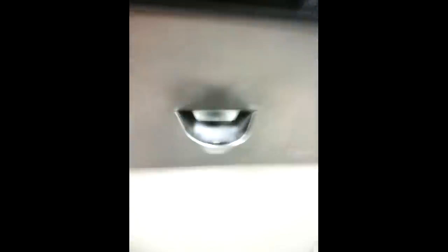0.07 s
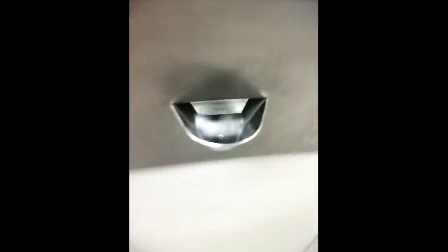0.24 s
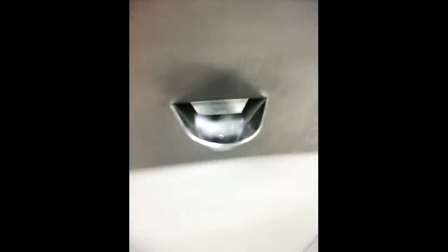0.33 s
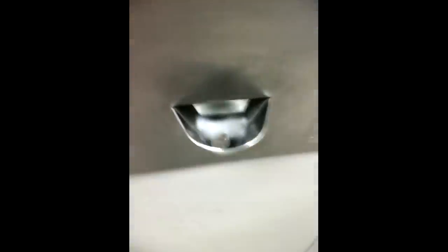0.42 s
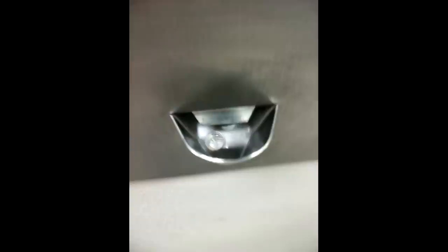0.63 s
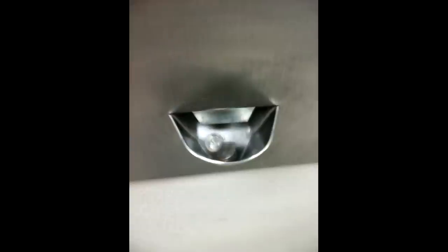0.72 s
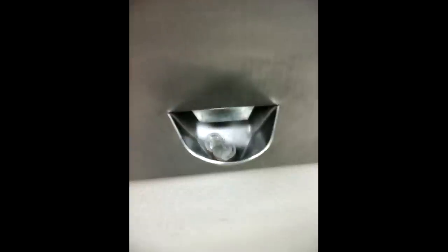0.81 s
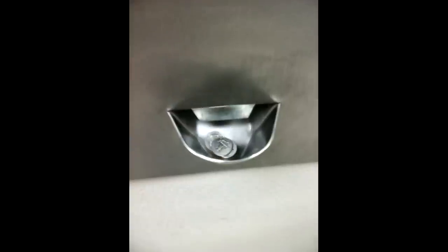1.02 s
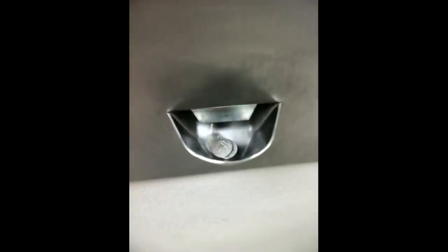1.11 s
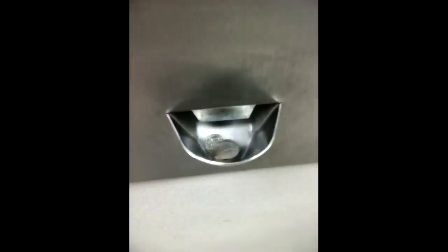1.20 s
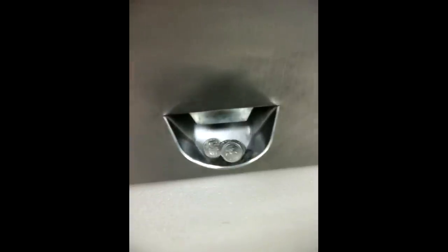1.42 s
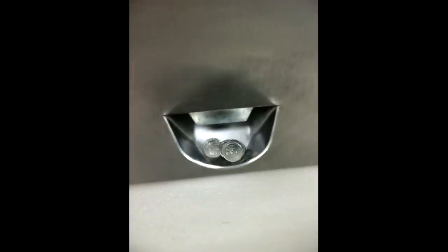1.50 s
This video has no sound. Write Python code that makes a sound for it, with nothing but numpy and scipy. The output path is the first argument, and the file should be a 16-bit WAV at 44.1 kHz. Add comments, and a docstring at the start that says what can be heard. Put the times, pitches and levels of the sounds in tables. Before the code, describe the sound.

Coins drop clinking into a steel tray as a machine clacks and faintly whirrs.

```python
"""A motor whirrs inside a change machine, then coins are paid into its steel tray.
The ejector clacks and rebounds, the cabinet panels thud, and a moment later a coin strikes
the chute, bounces, slides down and clinks against the others. Each blow is a crack of dense
modes over a few that ring on, with a short cabinet echo. At the end the motor winds down,
a coin skids round the bowl and there is one last clack."""
import sys
import numpy as np
from scipy import signal
from scipy.fft import rfft, irfft
from scipy.io import wavfile

SR = 44100
rng = np.random.default_rng(int(sys.argv[2]) if len(sys.argv) > 2 else 0)


def bounce(signal):
    """Save signal as a 16-bit WAV file at the path given by the first command-line argument."""
    frames = np.transpose(np.atleast_2d(signal))
    limited = np.clip(frames, -1, 1)
    pcm = np.round(limited * 32767).astype(np.int16)
    wavfile.write(sys.argv[1], SR, pcm)


N = 68355
T = np.arange(N) / SR

# Coins land and bounce: start_s, level_db, tilt_db_per_octave, spot ("middle" or "side")
COIN_HITS = [(.2546, -14, -1, "middle"), (.2610, -20.5, -4, "side"), (.2785, -38, 2, "side"),
             (.3105, -37.5, 5.5, "middle"), (.4393, -14.5, -0.5, "middle"), (.4605, -25, -4.5, "middle"),
             (0.5606, -35.5, 3, "middle"), (0.6290, -28, 2.5, "side"), (0.6354, -19, -1.5, "middle"),
             (0.7221, -34.5, -6, "middle"), (1.0225, -13.5, 0.5, "side"), (1.069, -32, 8, "side")]
# The ring of the steel chute: pitch_hz, level_db, t60_s
CHUTE_MODES = [(1010, -22.5, .17), (2915, -10, .09), (3010, -9, .1), (3258, -7, .065), (3597, -2, .052),
               (4150, -17, .05), (4890, 6, .04), (6110, -19, .06), (6620, -18, .07), (7890, -9.5, .05),
               (8400, -11, .055)]
# The crack of its dense modes: frequency_hz, level_db
CHUTE_CRACK_EQ = [(60, -47), (250, -19), (700, -18), (1100, -6.5), (2400, -3.5), (3000, 9.5), (5000, 8.5),
                  (5600, -2), (8600, 5), (10500, -15.5), (16000, -21)]


def coin_hits(ring_db=-3, off_centre_db=-11.5, slap_lag_s=.0018, slap_t60_s=.016):
    """Coins hit the chute edge first, then slap flat; off centre they stir its main mode less."""
    out = np.zeros(N)
    crack_eq = with_peaks(CHUTE_CRACK_EQ, CHUTE_MODES)
    slap = 1 + (T > slap_lag_s) * decay(abs(T - slap_lag_s), slap_t60_s)
    main_hz = max(CHUTE_MODES, key=lambda mode: mode[1])[0]
    for start_s, level_db, tilt, spot in COIN_HITS:
        modes = [(hz, db + ring_db + off_centre_db * (spot == "side" and hz == main_hz), t60_s)
                 for hz, db, t60_s in CHUTE_MODES]
        hit = strike(modes, crack_eq, tilt, crack_db=-3, crack_t60_s=.051, spread_db=.2)
        add(out, start_s, from_db(level_db) * hit * slap[:len(hit)])
    return out


# The ejector fires: start_s, snap_db, rebound_delay_s, rebound_db, tilt_db_per_octave
CLACKS = [(.2130, -13.5, 0.0075, -29, 2), (0.3924, -20, 0.0068, -24, -1), (0.486, -19, .0075, -29.5, 0),
          (0.5877, -15.5, 0.006, -29.5, 1.5), (0.6837, -17, 0.0079, -23.5, 0),
          (0.9728, -13.5, .0072, -22.5, 0), (1.1636, -41, 0.005, -31.5, 5), (1.5250, -22, 0.0086, -34, 4.5)]
# The ring of the ejector: pitch_hz, level_db, t60_s
EJECTOR_MODES = [(1749, -17.5, 0.069), (2791, -12, 0.069), (3650, -10, .03), (4800, -10.5, 0.012),
                 (5330, -9.5, 0.04), (5800, -19, 0.05), (8900, -29.5, 0.12)]
# The crack of its dense modes: frequency_hz, level_db
EJECTOR_CRACK_EQ = [(60, -43), (250, -8), (700, -9), (1700, 3), (3500, 3), (5300, 11.5), (6900, 0.5),
                    (7600, 0), (9200, -1.5), (10500, -20), (16000, -22)]
# The ping of rebound and latch: pitch_hz, level_db, t60_s
PING_MODES = [(5350, -6.5, 0.11), (6490, 8, 0.047), (6880, 5.5, 0.036), (9360, -17, 0.09)]
# The latch falls back: start_s, level_db
LATCH_TICKS = [(0.2362, -29.5), (0.4165, -35), (0.613, -28), (0.9975, -34), (1.5440, -30.5)]


def ejector(detune=.008, ping_db=-5.5):
    """Each clack is a snap and a pinging rebound, never tuned quite alike; a latch ticks after some."""
    out = np.zeros(N)
    steel = EJECTOR_MODES, EJECTOR_CRACK_EQ
    for start_s, snap_db, delay_s, rebound_db, tilt in CLACKS:
        snap = strike(*steel, tilt, crack_db=-8.5, crack_t60_s=.038, detune=detune)
        rebound = strike(*steel, tilt, crack_db=-2, crack_t60_s=.047, detune=detune)
        ping = from_db(ping_db) * ring(PING_MODES, len(rebound), detune=detune)
        add(out, start_s, from_db(snap_db) * snap)
        add(out, start_s + delay_s, from_db(rebound_db) * (rebound + ping))
    for start_s, level_db in LATCH_TICKS:
        latch = strike(PING_MODES[:1], EJECTOR_CRACK_EQ, tilt=0, crack_db=-6, crack_t60_s=.027)
        add(out, start_s, from_db(level_db) * latch)
    return out


# Edge meets edge: start_s, level_db
EDGE_TICKS = [(.4465, -21), (0.4924, -21), (.504, -23.5), (.572, -26), (0.731, -29), (.7735, -24.5),
              (0.802, -44), (.844, -30)]


def edge_ticks(t60_s=.0079):
    """Coin edges nick each other: very short, bright bursts of noise."""
    out, t = np.zeros(N), T[:1024]
    bright_eq = [(2000, -17), (7500, 8.5), (11000, -14)]   # frequency_hz, level_db
    for start_s, level_db in EDGE_TICKS:
        burst = equalise(rng.standard_normal(len(t)), bright_eq)
        add(out, start_s, from_db(level_db) * burst * decay(t, t60_s))
    return out


# A touch sets a coin ringing: start_s, coin_size, level_db
CLINKS = [(.262, "large", -57), (0.497, "large", -41), (0.566, "large", -45), (0.729, "large", -45),
          (0.769, "large", -41.5), (.799, "large", -50), (1.04, "large", -57), (1.150, "large", -39),
          (1.375, "large", -48.5), (0.687, "small", -37.5), (0.638, "medium", -38), (.773, "medium", -43.5),
          (1.132, "medium", -46.5)]
# The free ring of each coin size: pitch_hz, level_db, t60_s
COIN_MODES = {"large": [(6640, -1, .35), (15289, -2.5, .3)], "small": [(7585, 0, .6)],
              "medium": [(9300, -3, .3), (9420, -5, .3), (14067, -13, .06)]}


def clinks(rocking_hz=45, shimmer_depth=.45, attack_s=.0011):
    """Coins ring on after a touch, shimmering as they rock."""
    out = np.zeros(N)
    attack = np.minimum(T / attack_s, 1)
    for start_s, size, level_db in CLINKS:
        shimmer = 1 + shimmer_depth * wander(rocking_hz)
        add(out, start_s, from_db(level_db) * ring(COIN_MODES[size], N) * shimmer * attack)
    return out


# The swell of coins sliding down the chute: time_s, level_db
SLIDE_FADER = [(.21, -75), (.26, -58), (.32, -36), (.38, -41), (.54, -39), (.66, -37), (.84, -40.5),
               (.94, -51.5), (1.02, -42.5), (1.08, -38.5), (1.16, -45), (1.26, -52.5), (1.34, -77),
               (1.55, -56.5)]
# The tone of their rattle: frequency_hz, level_db
SLIDE_EQ = [(700, -39), (1100, -18), (2500, 2), (3500, 6), (4800, 7), (5500, 2), (7200, -2.5), (9300, -2),
            (10500, -17.5), (16000, -13)]


def slide(chute_db=-28, coins_db=-22.5):
    """Dense small touches of sliding coins rattle and set the chute and the coins ringing."""
    t = T[:N // 8]
    touches = contacts(per_s=900, spread_db=2.5)
    rattle = signal.fftconvolve(touches, rng.standard_normal(len(t)) * decay(t, .023))[:N]
    chute = signal.fftconvolve(touches, ring(CHUTE_MODES, len(t)))[:N]
    coins = signal.fftconvolve(touches, ring(COIN_MODES["large"], len(t)) * decay(t, .012))[:N]
    ringing = from_db(chute_db) * unit_rms(chute) + from_db(coins_db) * unit_rms(coins)
    return fader(SLIDE_FADER) * (equalise(rattle, SLIDE_EQ) + ringing)


# Swells of rubbing on steel, some coins skidding, some the tray ringing on after coins land: peak_s, rise_s,
# fall_s, level_db, centre_hz, width_octaves
SKIDS = [(0.097, 0.021, 0.014, -42, 4400, 0.17), (0.149, 0.011, 0.029, -45.5, 4330, 0.26),
         (0.837, 0.011, 0.017, -42, 1110, 0.22), (.843, 0.0079, 0.023, -43, 8100, 0.54),
         (1.07, 0.033, 0.11, -40.5, 2970, 0.014), (1.13, 0.067, 0.12, -45.5, 3640, 0.082),
         (1.3, .03, 0.025, -47, 1390, 0.058), (1.321, 0.0071, 0.022, -43, 8400, 0.31),
         (1.384, 0.013, 0.022, -41.5, 2530, 0.8), (1.385, 0.016, 0.045, -49, 8700, 0.26),
         (1.381, 0.012, 0.038, -44, 1097, 0.073), (1.43, 0.06, 0.024, -47.5, 1415, 0.12)]


def skids():
    """Short swells of fine rubbing, each ringing the steel roughly round one resonance."""
    out, grid_hz = np.zeros(N), np.geomspace(100, 18000, 2000)
    for peak_s, rise_s, fall_s, level_db, centre_hz, width_octaves in SKIDS:
        bell_db = -20 * np.log10(1 + (np.log2(grid_hz / centre_hz) / width_octaves) ** 2)
        swell = np.exp(-.5 * ((T - peak_s) / np.where(T < peak_s, rise_s, fall_s)) ** 2)
        rubbing = contacts(per_s=3300, spread_db=.5)
        out += from_db(level_db) * swell * equalise(rubbing, np.column_stack([grid_hz, bell_db]))
    return out


# Knocks in the cabinet panels: start_s, level_db, pitch_hz, t60_s
PANEL_THUDS = [(0.214, -35, 234, 0.094), (0.393, -30, 239, 0.083), (0.586, -41, 301, 0.13),
               (0.682, -43, 302, 0.18), (0.715, -43.5, 213.3, 0.29), (.974, -47.5, 224, 0.32)]


def panel_thuds(attack_s=.0084):
    """A knocked panel sounds one low, soft-edged, dying tone."""
    out, t = np.zeros(N), T[:N // 3]
    attack = np.minimum(t / attack_s, 1)
    for start_s, level_db, pitch_hz, t60_s in PANEL_THUDS:
        tone = np.sin(2 * np.pi * pitch_hz * t)
        add(out, start_s, from_db(level_db) * tone * decay(t, t60_s) * attack)
    return out


# The gear whirr runs, then drops away: time_s, level_db
WHIRR_FADER = [(0, -45), (.11, -42), (.2, -44), (.45, -42), (.8, -44.5), (.95, -45.5), (1.15, -42.5),
               (1.29, -46.5), (1.33, -53), (1.36, -68), (1.44, -63.5), (1.5, -64.5), (1.55, -64.5)]
# Its midrange tone: frequency_hz, level_db
WHIRR_EQ = [(400, -55), (700, -10.5), (900, -1), (1050, 7), (1400, 3), (2100, 2), (3000, -4.5),
            (5500, -7.5), (9000, -21.5), (15000, -46)]
# The cabinet rumble comes and goes: time_s, level_db
RUMBLE_FADER = [(0, -54), (.13, -55), (.23, -49.5), (.33, -53.5), (.41, -51), (.62, -52), (.77, -72.5),
                (.84, -58), (1, -49.5), (1.14, -68), (1.2, -50.5), (1.28, -72), (1.55, -67.5)]
# Its low body: frequency_hz, level_db
RUMBLE_EQ = [(25, -8), (70, -32), (170, -14.5), (225, -3.5), (310, 4), (380, -2), (460, 5), (620, -15.5),
             (1500, -51)]
# Motor hum and mains hum: pitch_hz, level_db
HUM_TONES = [(103, -63.5), (120, -61)]
# Both hums fade: time_s, gain_db
HUM_FADER = [(0, 1), (.7, 0.5), (1.1, -1), (1.55, -12)]


def motor(flutter_db=1.55, waver_db=4.8):
    """Fluttering gear whirr, cabinet rumble and two beating hums that waver."""
    flutter = from_db(flutter_db * wander(45))
    whirr = fader(WHIRR_FADER) * flutter * equalise(rng.standard_normal(N), WHIRR_EQ)
    rumble = fader(RUMBLE_FADER) * equalise(rng.standard_normal(N), RUMBLE_EQ)
    hum = np.zeros(N)
    for pitch_hz, level_db in HUM_TONES:
        gain = from_db(level_db + waver_db * wander(13.6))
        hum += gain * np.sin(2 * np.pi * (pitch_hz * T + rng.random()))
    return whirr + rumble + fader(HUM_FADER) * hum


def cabinet_echo(x, t60_s=.53, wet_db=-11.5, predelay_s=.00046):
    """The cabinet and the room add a short diffuse tail."""
    t = T[:N // 3]
    tail = rng.standard_normal(len(t)) * decay(t, t60_s) * (t > predelay_s)
    tail /= np.linalg.norm(tail)
    return x + from_db(wet_db) * signal.fftconvolve(x, tail)[:N]


def strike(modes, crack_eq, tilt, crack_db, crack_t60_s, attack_s=.00035, **scatter):
    """A blow on steel: a crack of dense modes over the few that ring on."""
    t = T[:8192]
    crack = equalise(rng.standard_normal(len(t)), crack_eq, tilt) * decay(t, crack_t60_s)
    ringing = ring(modes, len(t), tilt, **scatter)
    return (ringing + from_db(crack_db) * crack) * np.minimum(t / attack_s, 1)


def ring(modes, length, tilt=0, spread_db=4.5, detune=0):
    """Decaying sines, scattered at every blow in level and, by the fraction detune, in pitch."""
    out, t = np.zeros(length), T[:length]
    pivot_hz = np.median([mode[0] for mode in modes])
    for hz, db, t60_s in modes:
        gain = from_db(db + tilt * np.log2(hz / pivot_hz) + spread_db * rng.normal())
        pitch_hz = hz * (1 + detune * rng.normal())
        out += gain * decay(t, t60_s) * np.sin(2 * np.pi * (pitch_hz * t + rng.random()))
    return out


def contacts(per_s, spread_db):
    """Small touches: random impulses of uneven size."""
    impulses = (rng.random(N) < per_s / SR) * rng.choice([-1, 1], N)
    return impulses * from_db(spread_db * np.minimum(rng.exponential(1, N), 4))


def with_peaks(eq, modes, half_width_hz=70, boost_db=4):
    """An EQ curve with a resonant peak added at each mode."""
    grid_hz = np.geomspace(30, 18000, 2000)
    hz, db = np.transpose(eq)
    base_db = np.interp(np.log(grid_hz), np.log(hz), db)
    peaks = np.max([1 / (1 + ((grid_hz - mode[0]) / half_width_hz) ** 2) for mode in modes], axis=0)
    return np.column_stack([grid_hz, base_db + boost_db * peaks])


def equalise(x, eq, tilt=0):
    """Shape x with an EQ curve, tilted in dB per octave, and scale it to rms 1."""
    hz, db = np.transpose(eq)
    octave = np.log2(np.arange(len(x) // 2 + 1) * SR / len(x) + 1)
    gain = from_db(np.interp(octave, np.log2(hz), db + tilt * np.log2(hz)))
    return unit_rms(irfft(rfft(x) * gain, len(x)))


def wander(cutoff_hz):
    """Slow random motion of rms 1."""
    lowpass = signal.butter(2, cutoff_hz, fs=SR, output="sos")
    return unit_rms(signal.sosfilt(lowpass, rng.standard_normal(N + SR // 4))[-N:])


def fader(points):
    """Gain over time from (time_s, level_db) points."""
    return from_db(np.interp(T, *np.transpose(points)))


def decay(t, t60_s):
    """Exponential fall of 60 dB in t60_s."""
    return np.exp(-np.log(1000) * t / t60_s)


def from_db(db):
    """Decibels to gain."""
    return 10 ** (np.asarray(db) / 20)


def unit_rms(x):
    """Scale to rms 1."""
    return x / np.sqrt(np.mean(x ** 2) + 1e-20)


def add(out, start_s, sound):
    """Mix a sound in at start_s."""
    i = int(start_s * SR)
    out[i:i + len(sound)] += sound[:N - i]


def scene():
    """The mono mix, heard from just in front of the tray."""
    low_cut = signal.butter(2, 140, "high", fs=SR, output="sos")   # the blows are kept free of deep bass
    blows = signal.sosfilt(low_cut, ejector() + coin_hits())
    mix = cabinet_echo(blows) + panel_thuds() + edge_ticks() + clinks() + slide() + skids() + motor()
    return mix[None]


def record(dry):
    """A steep high cut at 15.6 kHz."""
    return signal.sosfilt(signal.ellip(10, .1, 80, 15600, fs=SR, output="sos"), dry)


dry = scene()
out = record(dry)
bounce(out)
```